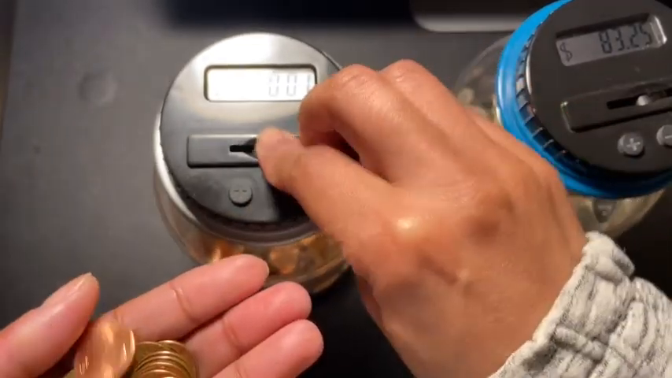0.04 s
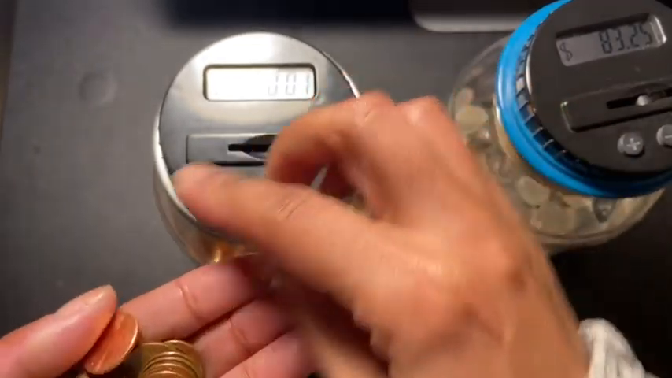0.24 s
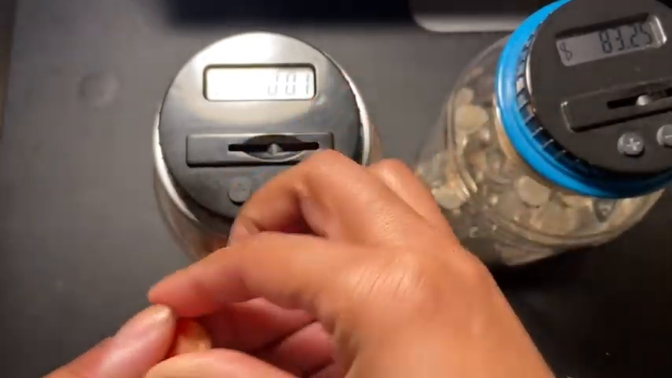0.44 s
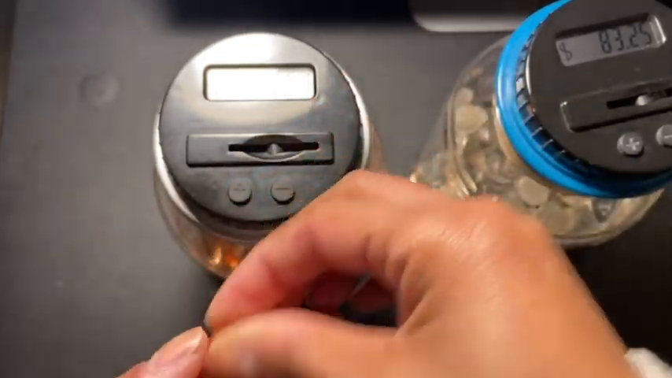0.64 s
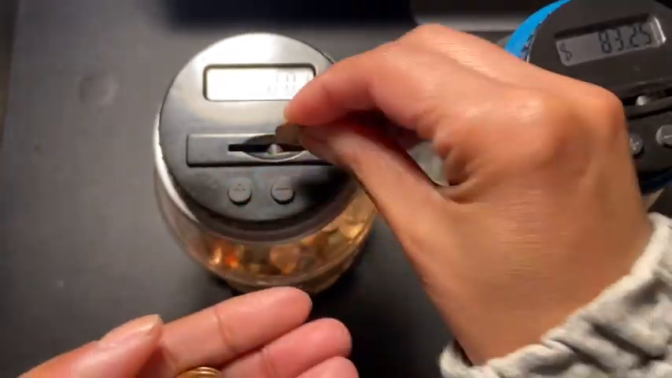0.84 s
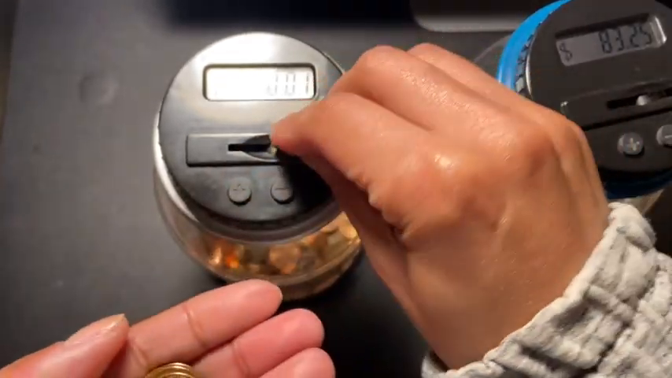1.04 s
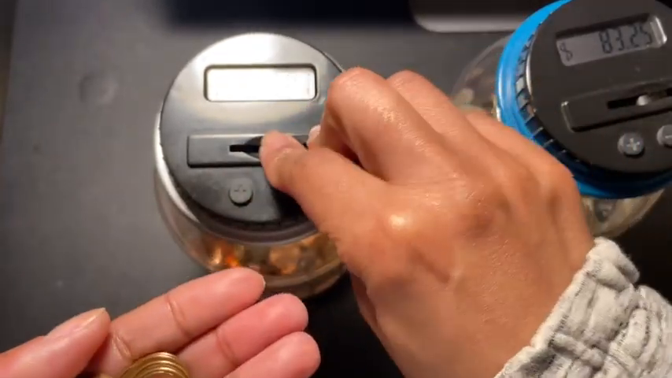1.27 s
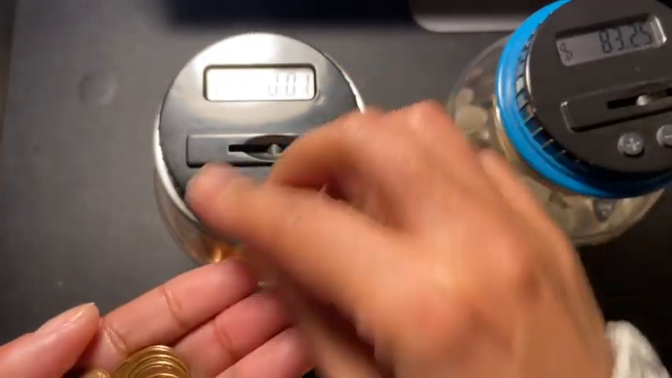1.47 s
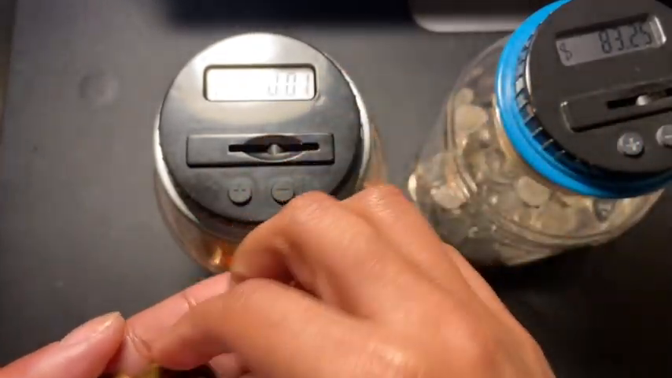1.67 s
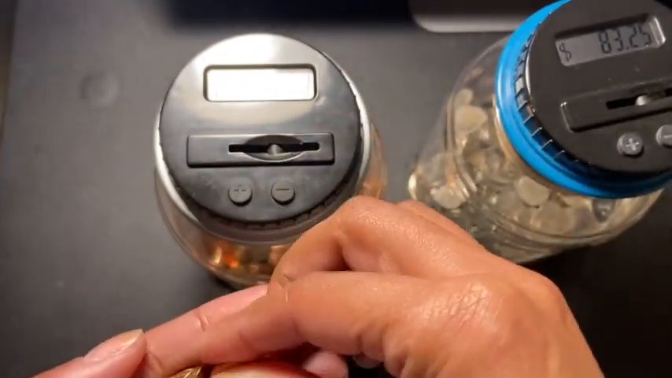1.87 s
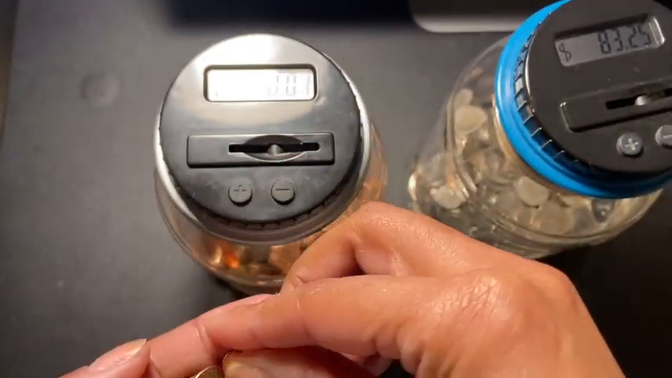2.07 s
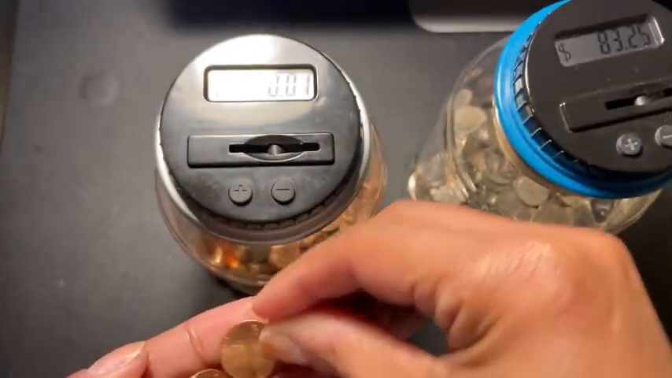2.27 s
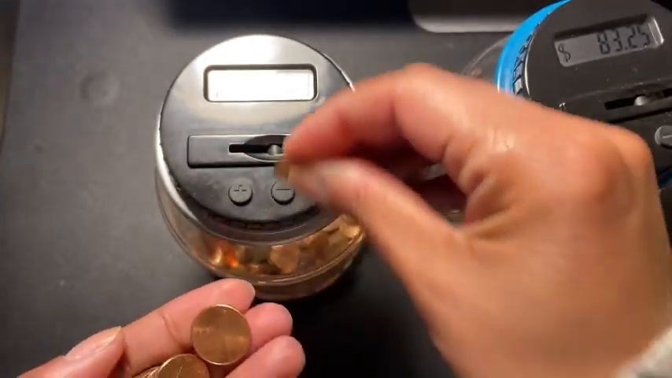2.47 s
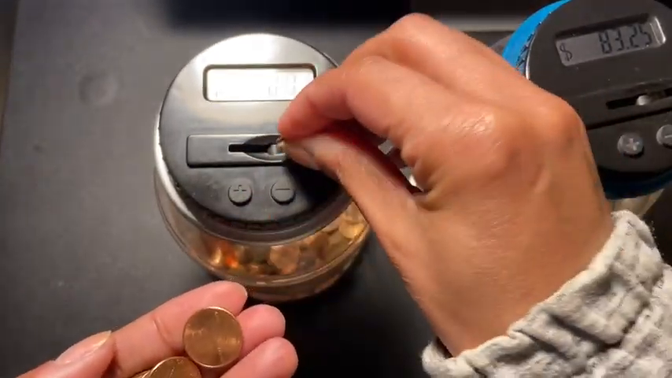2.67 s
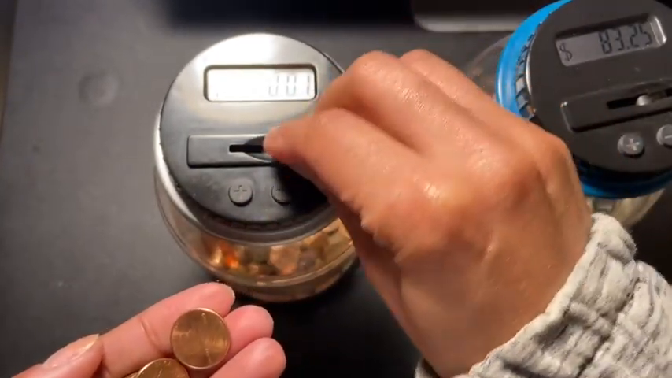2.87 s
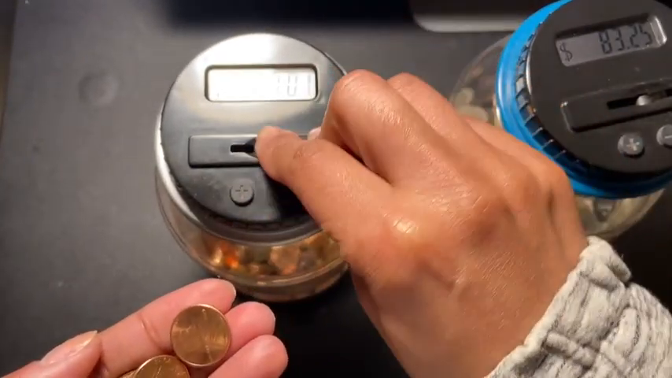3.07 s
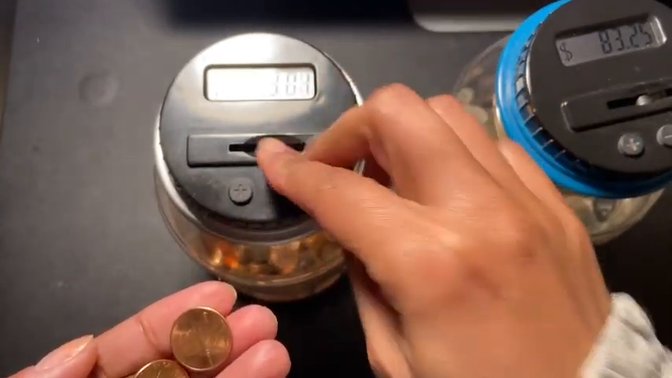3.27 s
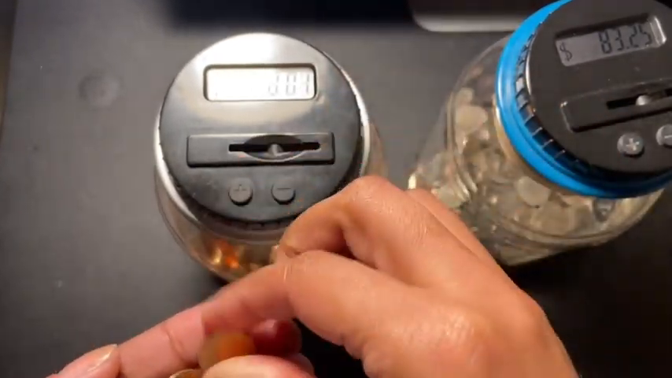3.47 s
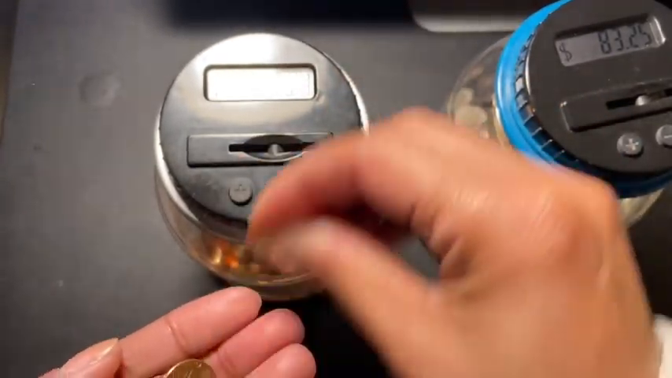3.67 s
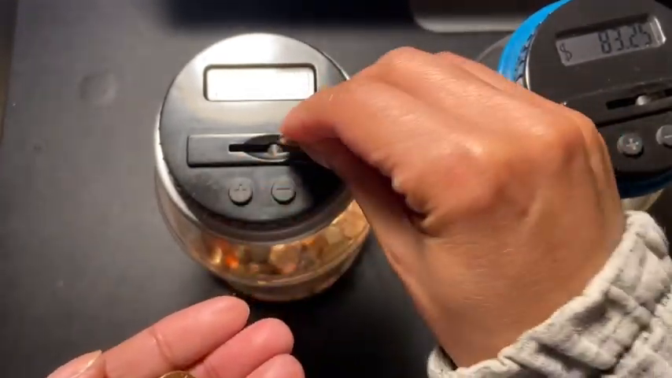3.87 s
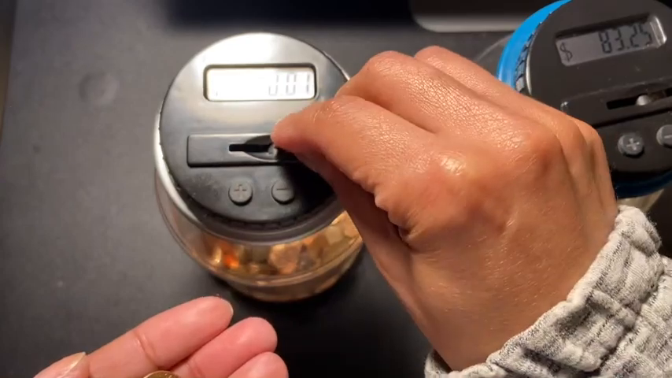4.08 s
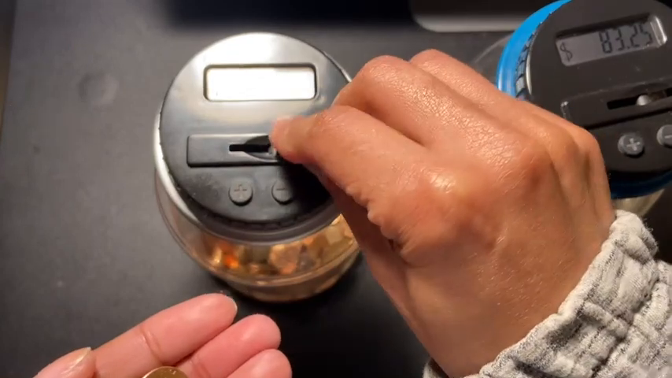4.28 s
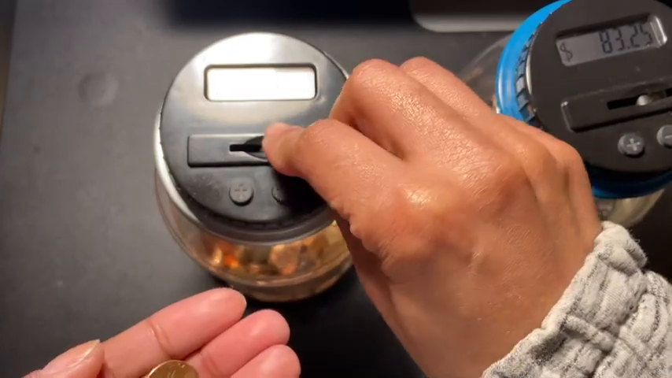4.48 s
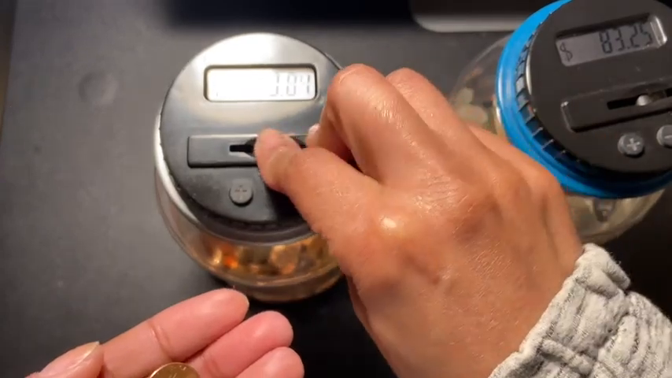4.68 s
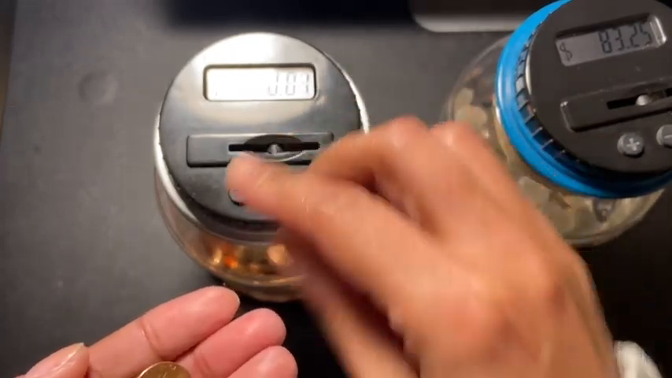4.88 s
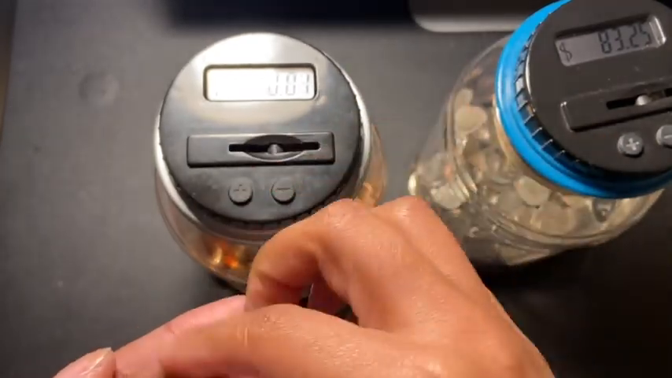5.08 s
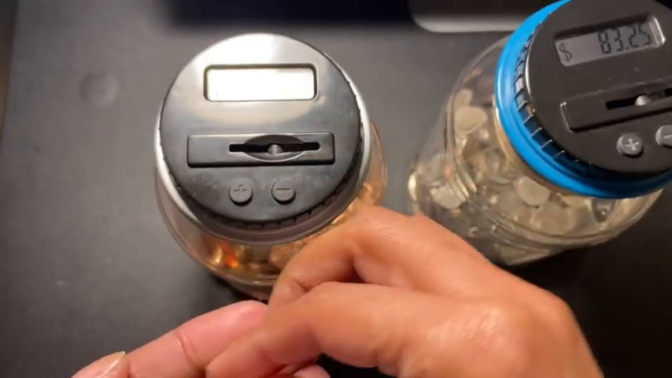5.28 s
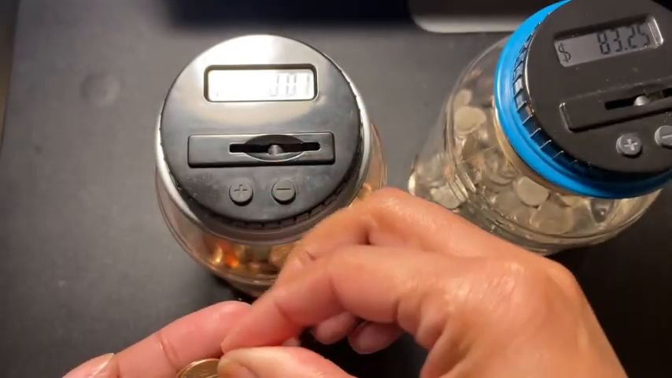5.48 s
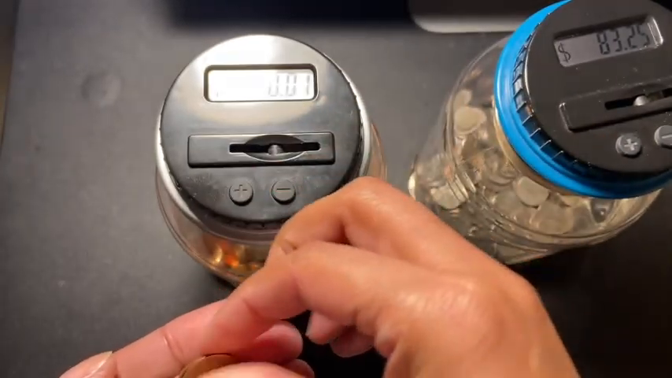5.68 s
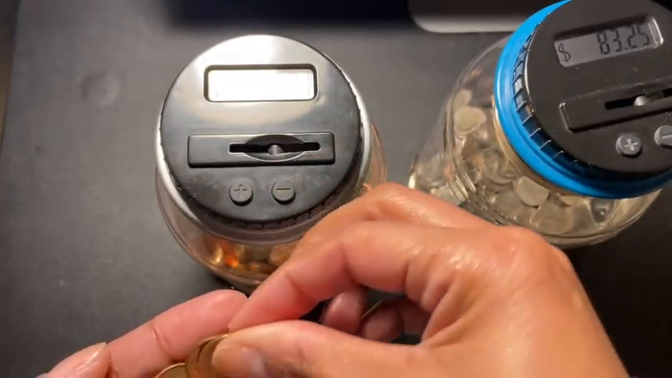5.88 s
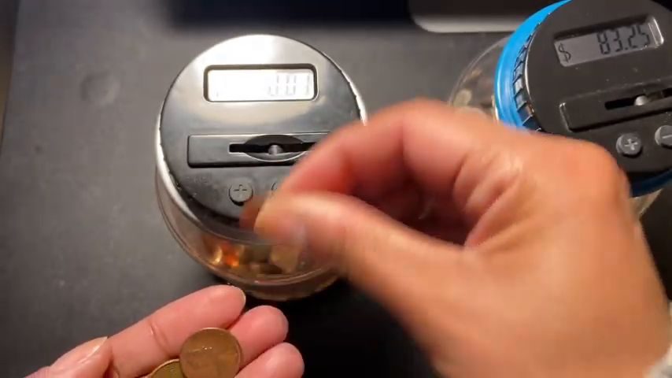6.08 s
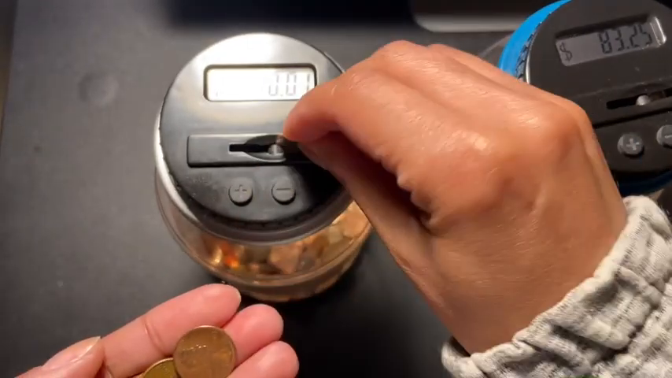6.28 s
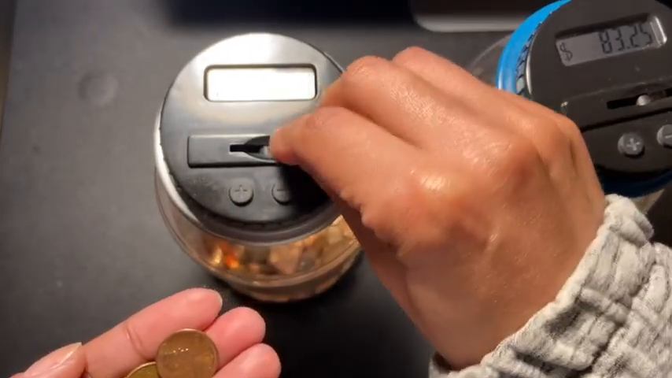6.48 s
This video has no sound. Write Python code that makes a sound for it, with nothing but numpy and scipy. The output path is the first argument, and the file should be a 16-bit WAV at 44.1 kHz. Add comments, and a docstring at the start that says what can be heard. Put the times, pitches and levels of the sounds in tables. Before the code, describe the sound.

One coin after another scrapes into a jar's slot, pings past a springy gate and clinks loudly on the heap, with bright palm clicks between.

```python
"""In a quiet room, small coins are picked from a palm and pushed through the slot of a plastic-lidded jar.
Contacts are bursts of micro-clicks that excite resonant modes of coin, lid and jar; rubbing is grainy noise.
The sprung gate pings and knocks, coins land and rattle on the heap, and thin sines ring after each drop.
Coloured noise rumbles below; two spaced microphone ports close by overload on the loudest blows."""
import sys
import numpy as np
from scipy import signal
from scipy.fft import rfft, irfft, next_fast_len
from scipy.io import wavfile
from scipy.ndimage import uniform_filter1d

SR = 44100
rng = np.random.default_rng(int(sys.argv[2]) if len(sys.argv) > 2 else 0)


def dump(signal):
    """Clip the signal to [-1, 1] and save it as 16-bit WAV at the path in sys.argv[1]."""
    limited = np.clip(np.atleast_2d(signal).T, -1, 1)
    pcm = np.round(limited * 32767).astype(np.int16)
    wavfile.write(sys.argv[1], SR, pcm)


N = 287973   # samples

# Low background of the room. Each row: frequency in Hz, relative spectral level in dB per Hz.
RUMBLE_SPECTRUM = [(15, -39.5), (25, -1), (64, -0.5), (143, 2), (221, -11), (504, -18), (745, -33.5),
                   (3230, -46), (5110, -51.5), (6000, -47), (7800, -70), (13200, -120)]
# The hand leaning on the jar stirs the table. Each row: start in s, end in s, rise of the rumble in dB.
LEANS = [(-.2, 0.02, 8.5), (0.8, 1.336, 15), (2.604, 2.84, 9), (3.153, 3.395, 5), (4.351, 4.795, 12.5),
         (6.1, 6.53, 13.5)]
RUMBLE_DB, RUMBLE_END_DB = -45.5, -49   # before stirring and wavering
LET_GO_S = 0.49   # the rise falls back over this time
RUMBLE_APART_HZ, BASS_APART = 500, 0.043   # above it the ports hear unrelated rumble; share that differs below

# Fingers and coins rubbing. Each row: time of the height in s, swell in s, fade in s,
# bright rustle in dB, its favoured frequency in Hz, dull scrape on the lid in dB.
RUBS = [(0.07, 0.17, .25, -41, 6100, -40.5), (0.47, 0.12, .15, -55.5, 9000, -69.5),
        (0.62, .05, .1, -59.5, 11000, -72.5), (1.26, 0.23, .08, -47.5, 5460, -57),
        (1.43, 0.12, .1, -37.5, 4930, -38.5), (1.66, 0.05, .15, -40.5, 10500, -55),
        (1.82, 0.21, .08, -38.5, 6600, -67.5), (2.1, 0.36, .1, -52.5, 7030, -87),
        (2.28, .05, .08, -46.5, 9000, -73.5), (2.36, 0.023, 0.045, -89, 5000, -60),
        (3.1, 0.26, .15, -50.5, 6330, -55.5), (3.33, .1, .12, -30.5, 5030, -36),
        (4.64, 0.22, .1, -63, 5200, -57.5), (4.83, 0.18, .12, -32.5, 6500, -39),
        (5.29, 0.26, .07, -50.5, 6100, -78), (5.72, 0.1, .1, -50, 6970, -74),
        (6.0, .08, .08, -48, 10010, -85), (6.43, 0.19, .15, -66, 8000, -53)]
RUB_RANGE_DB = 20.5   # change over one swell or fade
STILL_DB = -81.5   # floor of the rustle in each mode between rubs
TICKS_PER_S, TICK_DRIVE_DB = 25, 8   # grit that catches; the drive is halved where it is used

# Modes of the lid, of the coins and of the jar. Each row: frequency in Hz, width in Hz, relative level in dB.
LID = [(1053, 150, 6), (1481, 230, 4), (1451.6, 270, 3), (1715, 350, 0), (2110, 250, -5.5),
       (2410, 270, -3.5), (3130, 310, -1.5), (3830, 800, -2.5), (4990, 550, -0.5)]
COIN = [(5560, 750, 2), (6870, 860, 4.5), (8430, 2400, 3.5), (9520, 2500, 4), (10160, 780, 3),
        (13540, 2400, 2.5), (14060, 1100, 0.5), (14800, 610, -6), (15550, 360, -2.5)]
JAR = [(83.6, 41, -14.5), (146, 52, -6.5), (295, 80, -5), (408.4, 36, -1.5), (533.8, 29, 2), (688, 67, -5),
       (900, 58, -5.5)]

# Blows on lid and heap. Each row: start in s, drive of the lid in dB, drive of the coin in dB,
# time scale of the contact in ms, favoured lid tone in Hz.
BLOWS = [(0.02, -23, -28.5, 7.4, 2240), (0.1434, -2, -2, 3.5, 1790), (0.1559, -4, -10, 7.8, 2270),
         (0.195, -17, -14, 1.8, 2494), (0.2291, -26.5, -35.5, 7.8, 2870), (0.3361, -24, -36, 4.2, 2630),
         (0.9656, -11.5, -38.5, 2.44, 3300), (1.0137, -14.5, -20, 3.8, 2158), (1.0433, -27, -54, 3, 1720),
         (1.0766, -18.5, -21.5, 4.3, 1870), (1.115, -28.5, -39, 2.8, 1873), (1.1502, -29, -28, 3.2, 2090),
         (1.1751, -16, -24, 3.5, 2596), (1.3678, -5, -7, 4.1, 2280), (1.4419, -30, -32, 17, 2317),
         (1.479, -27, -26.5, 13.6, 2012), (1.5105, -31, -37, 17, 1860), (2.6776, -21.5, -46.5, 4.5, 3324),
         (2.69, -30.5, -54.5, 16.3, 2685), (2.7397, -9.5, -18, 3.46, 1980), (2.7607, -21, -41, 1.4, 1805),
         (2.8162, -28, -41, 2.3, 3550), (2.852, -22, -25.5, 5.2, 1850), (2.8909, -28.5, -37, 4, 1860),
         (2.995, -33.5, -61, 4.3, 1550), (3.1392, -30.5, -31, 3.2, 1846), (3.2467, -6.5, -10, 6.4, 2546),
         (3.2884, -22.5, -29.5, 16, 1900), (3.321, -22.5, -25, 5, 2300), (3.3284, -13.5, -23.5, 4.6, 2015),
         (3.3457, -16, -26, 4.1, 1805), (3.3554, -20.5, -30, 10.1, 1580), (3.3786, -9, -29, 2.4, 2010),
         (3.396, -23, -24.5, 7.6, 2035), (3.4346, -30, -31.5, 5.6, 2670), (3.8833, -35, -61, 7.4, 2220),
         (4.0066, -32.5, -43, 3.6, 1978), (4.2745, -39.5, -60, 2.4, 1740),
         (4.283, -24.5, -58.5, 2.26, 1800), (4.3052, -41, -41, 7.5, 1860), (4.3268, -24.5, -27, 4.5, 2684),
         (4.4581, -30.5, -41, 3.3, 1667), (4.5103, -41.5, -64.5, 3.8, 1590),
         (4.5248, -40.5, -70.5, 3.1, 1692), (4.6426, -24, -55, 7.7, 2237), (4.7678, 3.5, 4, 5.2, 2352),
         (4.8564, -35, -25.5, 4.2, 1910), (4.908, -31, -30, 5.6, 2600), (4.9812, -32.5, -37, 5.5, 2194),
         (6.2591, -21, -31, 5.1, 2210), (6.2717, -14.5, -31, 9.3, 2430), (6.3353, -15, -24, 3.24, 2194),
         (6.3677, -28.5, -54, 1.4, 1810), (6.402, -21.5, -18.5, 4.9, 2930), (6.4523, -26, -33, 3.9, 1856),
         (6.4849, -28, -33, 1.9, 2740)]
# The hand bumps the jar softly. Each row: start in s, boom in dB, time scale of the contact in ms.
BUMPS = [(2.8152, -24, 3.4), (3.1932, -22.5, 6), (3.63, -50, 8.4), (4.51, -26, 3.4), (4.524, -30.5, 5.5),
         (4.595, -34.5, 4.3), (6.155, -23, 18)]
# Coins landing inside. Each row: start in s, extra boom of the jar in dB, starting level of each lasting tone in dB.
DROPS = [(.146, 14.6, -37, -67, -60, -72), (1.37, 14, -38.5, -58, -51.5, -69),
         (3.25, 4.4, -40.5, -43, -49, -65.5), (4.77, 12.8, -45.5, -49, -48, -71)]
# The jar booms with the lid's level (dB per dB); duller blows boom more.
BOOM_DB, BOOM_FOLLOWS, BOOM_DB_PER_OCTAVE = -10, 0.8, -7.5

ROOM_DB, PALM_ROOM_DB = -12, -7.5   # all reverberation; the palm's sound sent into it
ROOM_T60_S, TREBLE_T60_S, TREBLE_HZ = 0.24, 0.18, 4300   # decay below and above the dividing frequency

# The coin forces the sprung gate. Each row: release in s, drive of the lid in dB, drive of the coin in dB,
# jar boom in dB, time constant of the swell in ms, chatter before release in ms.
SNAPS = [(0.0595, -7.5, -9, -19.5, 2.5, 7.3), (1.274, -6, -7, -18, 6.55, 1.3),
         (3.1650, -6, -8, -18, 3.2, 5.1), (4.6708, -6.5, -9.5, -16, 2.5, 6.0)]
# Release, then the gate hits home. Each: frequency in Hz, width in Hz, relative level in dB.
GATE_PING, GATE_KNOCK = (5000, 89, -11.5), (1090, 50, -9)
KNOCK_LAG_MS, CHATTER_AFTER_MS = 3.3, 3.4

# Thin lasting tones of the jar. Each row: frequency in Hz, time to fall by 60 dB in s.
LONG_RING = [(576, 1.2), (2089, .4), (2950, 1.35), (4032, 2.6)]

# Coins touching in the palm. Each row: start in s, level in dB, time scale of the contact in ms,
# favoured frequency in Hz.
PALM = [(0.3953, -25, 5.4, 8900), (0.436, -22.5, 2, 9150), (0.4444, -19.5, 1.5, 8740),
        (0.452, -29, 7.5, 9160), (0.478, -29, 2, 7240), (0.53, -31.5, 1.4, 6840), (0.5797, -20, 1.35, 7900),
        (0.5858, -25.5, 9.6, 9700), (0.625, -21.5, 4.1, 12100), (0.6379, -12.5, 8, 12700),
        (0.6584, -10.5, 12, 13400), (0.6814, 4.5, 3.33, 14700), (1.6183, -20, 3, 13800),
        (1.652, -20, 4.8, 13300), (1.6698, -18, 38, 9500), (1.6903, -5, 2, 10200),
        (1.7081, 5.5, 3.35, 12100), (1.716, -23, 3.4, 10500), (1.7454, -8, 6, 10700),
        (1.7684, -21, 4, 11300), (1.778, -6.5, 1.6, 8800), (1.8143, -8, 1.5, 7700), (1.823, -19, 3, 9600),
        (1.835, -17, 3.2, 7260), (1.8556, -25.5, 7, 9100), (1.8826, -17.5, 2.5, 8160),
        (1.8899, -7.5, 1.46, 6900), (1.9525, -36.5, 1.6, 5170), (2.019, -36.5, 3.9, 9300),
        (2.034, -37, 7.4, 6530), (2.1252, -28, 0.64, 10940), (2.1349, -27.5, 2.2, 9870),
        (2.1522, -32.5, 1.6, 11100), (2.2732, -31.5, 1.8, 12300), (2.3014, -24, 0.94, 7200),
        (3.4803, -10.5, 2.86, 10900), (3.8752, -29.5, 2.1, 5267), (5.021, -13, 1.7, 12040),
        (5.0268, -16.5, 2, 13200), (5.0962, -28, 1.6, 10100), (5.1267, -27.5, 1.1, 9820),
        (5.173, -28, 1.8, 6170), (5.195, -14.5, 0.62, 6020), (5.201, -26, 1.2, 6920),
        (5.219, -35, 3.3, 7900), (5.238, -32, 0.95, 7700), (5.28, -26, 1.8, 6150), (5.292, -27, 1.46, 6800),
        (5.311, -29, 1.9, 9100), (5.355, -29.5, 9.4, 8700), (5.3802, -10.5, 5.5, 13050),
        (5.394, -14.5, 2.8, 11530), (5.587, -46.5, 1.8, 7890), (5.6311, -31.5, 4.8, 10200),
        (5.6372, -23.5, 4.3, 9500), (5.6603, -30.5, 3.5, 9900), (5.6834, -27, 3.3, 8300),
        (5.696, -33, 2.7, 8660), (5.7602, -27.5, 1.7, 6660), (5.8677, -36, 1.65, 11500),
        (5.94, -31.5, 2.5, 10600), (5.9845, -23, 8.4, 11600), (5.995, -22.5, 6.7, 8600),
        (6.0183, -20, 3.4, 11500)]

# Phase between the ports. Each row: frequency in Hz, lead of the left in radians.
PORT_PHASE = [(0, 0), (800, -.25), (1050, -.8), (1250, .1), (2000, .1), (2700, 1), (4300, .6), (5000, .4),
              (7000, 3.1), (8300, 4), (9600, 5.8), (11500, 7.2), (13000, 9), (16000, 12.2), (22050, 18)]
# Level between the ports. Each row: frequency in Hz, left minus right in dB.
PORT_BALANCE = [(60, -.1), (250, .1), (600, 2), (1300, -2.5), (2800, -1.7), (5600, .8), (11000, 0)]
CUTOFF_HZ = 16250   # from here up the treble is 65 dB down


def from_db(db):
    """Decibel law: amplitude ratio of a level."""
    return 10 ** (np.asarray(db) / 20)


def rms_one(x):
    """Normalisation to unit effective value."""
    return x / np.sqrt(np.mean(x ** 2) + 1e-20)


def level_with(x, model):
    """Energy matching: x scaled to the energy of model."""
    return x * np.linalg.norm(model) / np.linalg.norm(x)


def resonance(x, hz, width_hz):
    """Damped oscillator: a two-pole peak with gain near 1 on top."""
    radius = np.exp(-np.pi * width_hz / SR)
    loss = 1 - radius * radius
    poles = [1, -2 * radius * np.cos(2 * np.pi * hz / SR), radius * radius]
    return signal.lfilter([loss / 2, 0, -loss / 2], poles, x + 1e-18)


def body(x, modes, strengths_db=0):
    """Modal superposition: parallel modes of alternating sign; at strength 0 white noise keeps its level."""
    gains = from_db(np.array(modes)[:, 2:] + strengths_db)
    click = signal.unit_impulse(2048)
    ringing, response = 0, 0
    for k, (hz, width, db) in enumerate(modes):
        sign = (-1) ** k
        ringing = ringing + sign * resonance(gains[k] * x, hz, width)
        response = response + sign * from_db(db) * resonance(click, hz, width)
    return ringing / np.linalg.norm(response)


def near(modes, hz, db_per_octave):
    """Selective excitation: modes close to a tone are favoured."""
    return -db_per_octave * np.abs(np.log2(np.array(modes)[:, :1] / hz))


def micro_clicks(size, lumpy_db):
    """Irregular contact between rough surfaces: noise in uneven lumps."""
    noise, lumps = rng.standard_normal((2, size))
    return noise * from_db(lumpy_db * rms_one(uniform_filter1d(lumps, size=40)))


def rattle(length_ms, rise, fall, edge, lumpy_db):
    """Brief repeated impact: micro-clicks swell and die away; the time scale sets their energy."""
    t = np.arange(SR // 8) / SR / (length_ms / 1000)   # in units of the time scale
    shape = (1 - np.exp(-t / rise)) * np.exp(-fall * t ** edge)
    return level_with(shape * micro_clicks(len(t), lumpy_db), shape)


def add(out, s, x):
    """Linear superposition of an event starting at s seconds."""
    i = round(s * SR)
    out[..., i:i + x.shape[-1]] += x[..., :N - i]


def rumble():
    """Partial coherence: stirred low noise, alike at both ports only in the bass; also a faint hiss."""
    hz = np.maximum(np.fft.rfftfreq(N, 1 / SR), 1)
    table = np.array(RUMBLE_SPECTRUM)
    colour = from_db(np.interp(np.log(hz), np.log(table[:, 0]), table[:, 1]))
    apart = BASS_APART + (1 - BASS_APART) / (1 + (RUMBLE_APART_HZ / hz) ** 2)
    spectra = rfft(rng.standard_normal((2, N))) * colour
    mid, side = irfft(spectra * [np.ones_like(hz), apart], N)
    t = np.arange(N) / SR
    slow = uniform_filter1d(uniform_filter1d(rng.standard_normal(N), size=3000), size=3000)
    wavers_db = 2.5 * rms_one(slow)
    stirred_db = sum(np.interp(t, [start, end, end + LET_GO_S], [0, db, 0]) for start, end, db in LEANS)
    level = from_db(np.linspace(RUMBLE_DB, RUMBLE_END_DB, N) + stirred_db + wavers_db)
    hiss = from_db(-78.5) * rng.standard_normal(N)
    return level * rms_one(np.array([mid + side, mid - side])), hiss


def slide():
    """Friction: dense uneven grains and scattered ticks excite coin and lid; each rub swells and fades."""
    s, swell, fade, bright_db, hz, dull_db = np.transpose(RUBS)[:, :, None]
    late = np.arange(N) / SR - s
    shape = from_db(RUB_RANGE_DB * np.minimum(late / swell, -late / fade))
    lumps = rms_one(uniform_filter1d(rng.standard_normal((2, N)), size=300))
    grains = rng.standard_normal((2, N)) * from_db(1.2 * lumps)
    catches = 1. * (rng.random((2, N)) < TICKS_PER_S / SR)
    ticks = 20 * uniform_filter1d(catches, size=40)   # height one half over 40 samples
    grains = grains * (1 + from_db(TICK_DRIVE_DB) * ticks)
    bright_modes = LID[-2:] + COIN
    # one strength for each mode at each sample
    strengths = from_db(bright_db.T + near(bright_modes, hz.T, 6.0)) @ shape + from_db(STILL_DB)
    rustle = body(grains[0], bright_modes, 20 * np.log10(strengths))
    dull = from_db(dull_db.T)[0] @ shape + from_db(STILL_DB - 5.5)
    return rustle + dull * body(grains[1], JAR[-2:] + LID)


def shake(drive, lid_db, coin_db, boom_db, tone_hz, tilt_db):
    """Shared excitation: one rattle shakes lid and coin unevenly; its hardest click thumps the jar."""
    lid_chance, coin_chance, jar_chance = [rng.normal(0, 1.5, (len(modes), 1)) for modes in (LID, COIN, JAR)]
    hardest = signal.unit_impulse(len(drive), np.argmax(np.abs(drive)))
    thump = hardest * np.linalg.norm(drive) + .5 * drive
    ringing = level_with(body(drive, LID, lid_chance + near(LID, tone_hz, tilt_db)), drive)
    # many small damped modes blur into one broad clack
    scattered = np.abs(drive) * rng.choice([-1, 1], len(drive))
    clack = body(scattered, [(tone_hz, 0.59 * tone_hz, 0)])
    lid = from_db(lid_db) * (0.85 * ringing + 0.53 * clack)
    coin = from_db(coin_db) * body(drive, COIN, coin_chance)
    return lid + coin + from_db(boom_db) * body(thump, JAR, jar_chance)


def blows():
    """Impact excitation: taps on the slot, landings, bounces and soft bumps set the modes ringing."""
    out = np.zeros(N)
    for s, lid_db, coin_db, length_ms, tone_hz in BLOWS:
        landing_db = sum(db for at, db, *_ in DROPS if abs(at - s) < .008)
        octaves = np.log2(tone_hz / 2000)
        boom_db = BOOM_DB + BOOM_FOLLOWS * lid_db + BOOM_DB_PER_OCTAVE * octaves + landing_db
        contact = rattle(length_ms, rise=0.13, fall=1.365, edge=0.84, lumpy_db=3.0)
        add(out, s, shake(contact, lid_db, coin_db, boom_db, tone_hz, tilt_db=12.5))
    for s, boom_db, length_ms in BUMPS:
        soft = rattle(length_ms, rise=0.28, fall=1.4, edge=0.9, lumpy_db=1.0)
        add(out, s, from_db(boom_db) * body(soft, JAR, near(JAR, 150, 14.0)))
    return out


def room(x):
    """Reverberation: table and walls answer densely, treble dying first, unlike at the ports above the bass."""
    t = np.arange(SR // 2) / SR
    shared, *own = rng.standard_normal((3, len(t))) * (1 - np.exp(-t / 0.0013))
    noise = shared + 0.86 * signal.lfilter(*signal.butter(2, 350, "high", fs=SR), own)
    low = signal.lfilter(*signal.butter(2, TREBLE_HZ, fs=SR), noise)
    treble = 0.53 * (noise - low)
    tail = low * from_db(-60 * t / ROOM_T60_S) + treble * from_db(-60 * t / TREBLE_T60_S)
    tail = tail / np.linalg.norm(tail[0])
    return from_db(ROOM_DB) * signal.fftconvolve(x[None], tail, axes=1)[:, :N]


def gate():
    """Release of a loaded spring: scraping swells into chatter; the gate lets go with a ping and knocks home."""
    out = np.zeros(N)
    ms = np.arange(SR // 5) / SR * 1000 - 40   # zero at the release
    for s, lid_db, coin_db, boom_db, swell_ms, chatter_ms in SNAPS:
        swell = np.exp(np.minimum(ms + chatter_ms, 0) / swell_ms)
        swell = swell * np.where(ms < -chatter_ms, .4, 1)   # chatter sets in with a step
        fade = np.exp(-np.maximum(ms - CHATTER_AFTER_MS, 0) / 2.5)
        drive = swell * fade * micro_clicks(len(ms), lumpy_db=2.0)
        snap = shake(drive, lid_db, coin_db, boom_db, tone_hz=2200, tilt_db=4.0)
        for (hz, width, db), lag_ms in ((GATE_PING, 0), (GATE_KNOCK, KNOCK_LAG_MS)):
            push = np.exp(-((ms - lag_ms) / 1.5) ** 2) * np.sin(2 * np.pi * hz * ms / 1000)
            snap += from_db(db) * resonance(push, hz, width) * 2.3
        add(out, s - .04, snap)
    return out


def long_ring():
    """Free decay of lightly damped modes: sines that die away after each drop."""
    out, t = np.zeros(N), np.arange(SR * 2) / SR
    for s, _, *levels_db in DROPS:
        for level_db, (hz, t60) in zip(levels_db, LONG_RING):
            add(out, s, from_db(level_db - 60 * t / t60) * np.sin(2 * np.pi * hz * t))
    return out


def palm():
    """Damping by skin: each touch is a bright tick that favours the modes near its own frequency."""
    out, modes = np.zeros(N), LID[-3:] + COIN
    for s, level_db, length_ms, hz in PALM:
        touch = rattle(length_ms, rise=0.36, fall=0.85, edge=1.12, lumpy_db=4.0)[:SR // 16]
        chance_db = rng.normal(0, 2.0, (len(modes), 1))
        tick = body(touch, modes, near(modes, hz, 12.0) + chance_db)
        add(out, s, from_db(level_db) * level_with(tick, touch))
    return signal.sosfilt(signal.butter(2, 1800, "high", fs=SR, output="sos"), out)


def ports(x):
    """Diffraction: the body around the two ports gives each its own delay and shading by frequency."""
    size = next_fast_len(N + 4096)
    hz = np.fft.rfftfreq(size, 1 / SR)
    lead = np.interp(hz, *np.transpose(PORT_PHASE))
    at, db = np.transpose(PORT_BALANCE)
    tilt = np.interp(np.log(hz + 1), np.log(at + 1), db)
    half = from_db(tilt / 2) * np.exp(.5j * lead)   # half the difference goes to each port
    return irfft(rfft(x, size) * [half, 1 / half], size)[:, :N]


def scene():
    """Superposition of direct sound, reverberation and background at the two ports."""
    hand, jar = palm(), blows() + gate()
    low, hiss = rumble()
    reverberation = room(jar + from_db(PALM_ROOM_DB) * hand)
    return ports(hand + jar + long_ring() + reverberation + slide() + hiss) + low


def record(dry, hardness=2.6):
    """Saturation: the deepest bass is lost, the loudest peaks are flattened, then the top is cut."""
    dry = signal.sosfilt(signal.butter(2, 34, "high", fs=SR, output="sos"), dry)
    flat = 0.97 * dry / (1 + np.abs(dry) ** hardness) ** (1 / hardness)
    top_cut = signal.cheby2(18, 65, CUTOFF_HZ, fs=SR, output="sos")
    return np.clip(signal.sosfilt(top_cut, flat), -1, 1)


dry = scene()
out = record(dry)
dump(out)
```